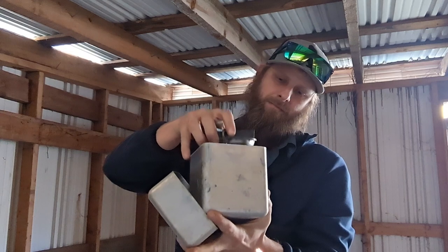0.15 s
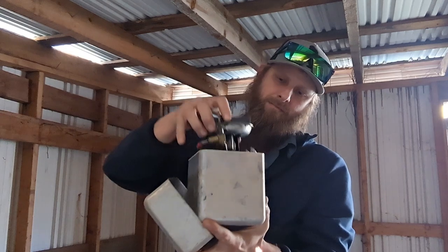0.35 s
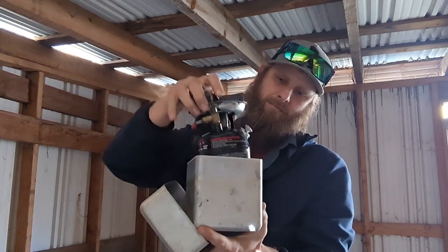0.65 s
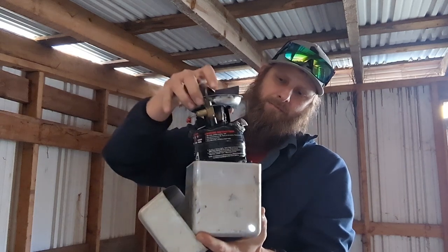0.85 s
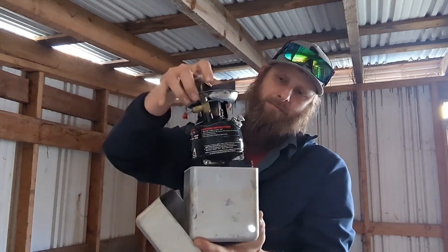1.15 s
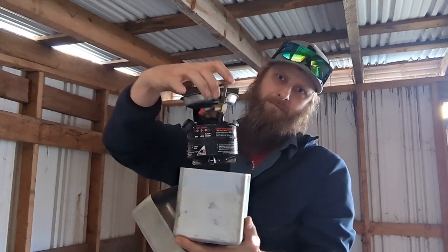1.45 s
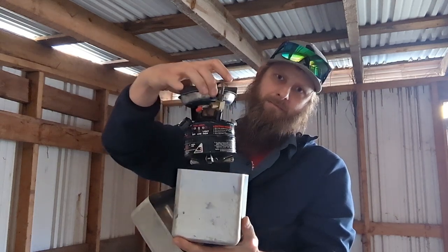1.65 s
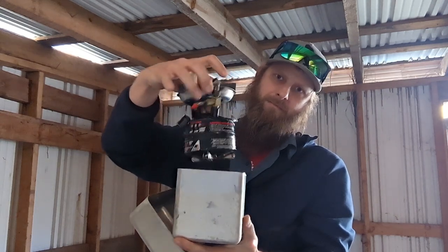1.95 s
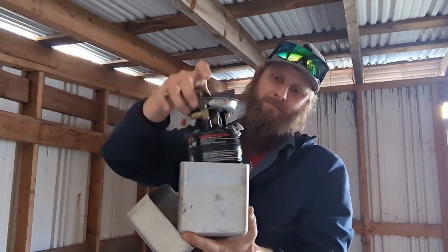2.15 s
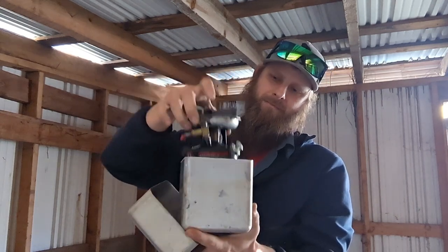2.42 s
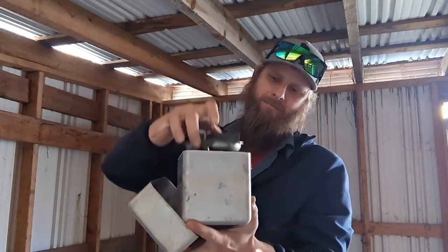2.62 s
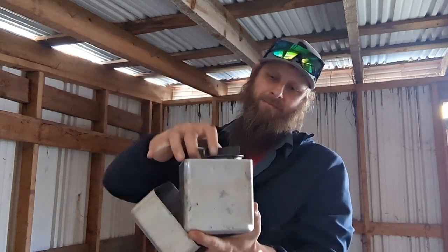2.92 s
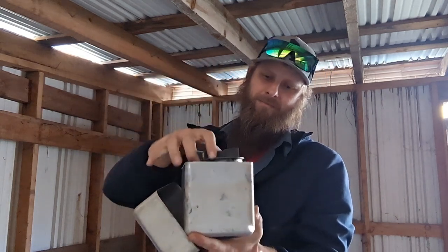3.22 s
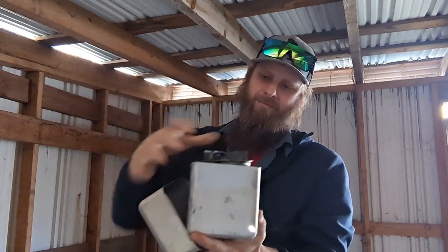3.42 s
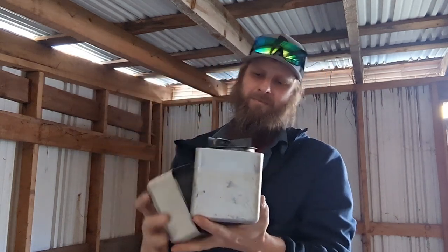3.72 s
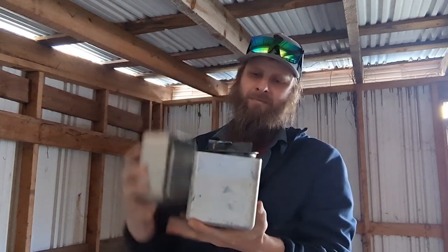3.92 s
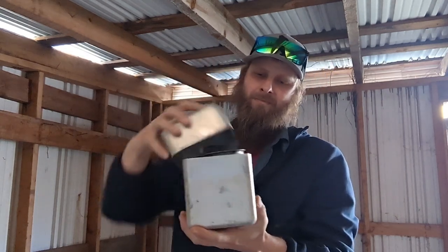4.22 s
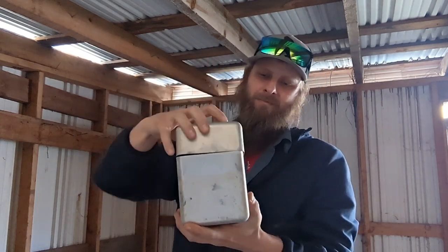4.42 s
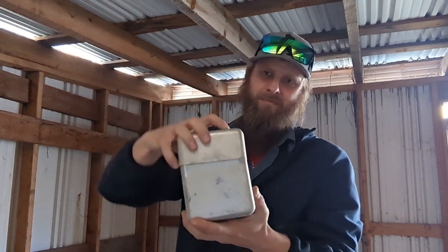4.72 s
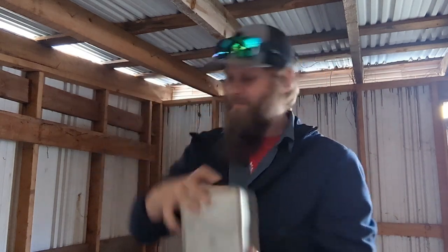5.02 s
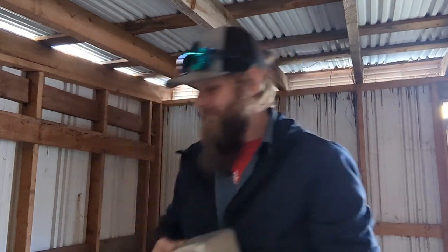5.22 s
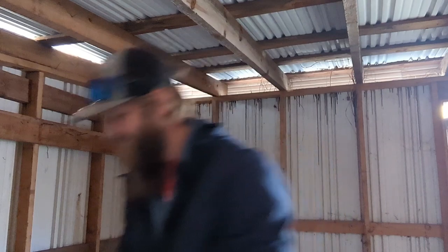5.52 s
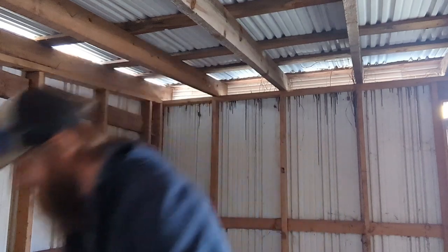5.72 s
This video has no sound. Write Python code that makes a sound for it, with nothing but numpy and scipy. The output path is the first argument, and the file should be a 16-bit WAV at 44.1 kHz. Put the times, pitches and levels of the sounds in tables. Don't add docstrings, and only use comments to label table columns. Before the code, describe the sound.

A close stereo view of hand-held thin metal in a quiet shed, with soft low rumble, a faint wavering hum and a short diffuse echo. From 0 to 0.5 s a small stove scrapes gently out of a square pot with light, hollow ticks. Then it is almost still, apart from faint short bird whistles outside between 0.5 and 2.2 s. At 2.15 s a hollow knock rings, with two weaker ones after. From 2.5 to 2.8 s the stove clatters and slides back in, loudest near 2.74 s, its ring damped by fingers. Around 3.1-3.35 s come small taps and a brighter jingling rattle. The lid clinks and scrapes as it is picked up at 3.8-4.05 s, then knocks and slides on at 4.3-4.6 s, seating with a dull double tap at 4.8 s. From about 5 s to the end, a synthetic jacket swishes, rubs and thumps unevenly, with faint metal ticks.

```python
import sys
import numpy as np
from scipy import signal
from scipy.fft import rfft, irfft, next_fast_len
from scipy.io import wavfile
from scipy.ndimage import map_coordinates

SR = 44100
rng = np.random.default_rng(int(sys.argv[2]) if len(sys.argv) > 2 else 0)


def generate_wav(sig):
    pcm = np.round(np.clip(np.atleast_2d(sig).T, -1, 1) * 32767).astype(np.int16)
    wavfile.write(sys.argv[1], SR, pcm)


def how_loud(loudness_db):
    steps = np.asarray(loudness_db, float) / 20
    return 10 ** steps


N = 258405


def unit(x):
    return x / np.sqrt(np.mean(x ** 2) + 1e-20)


def along(points, hz):
    f, v = np.transpose(points)
    return np.interp(np.log(hz + 1), np.log(f + 1), v)


def curves(rows):
    s, *cols = np.transpose(rows)
    t = np.arange(N) / SR
    first = np.interp(t, [s[0] - 0.01, *s, s[-1] + 0.036], [-120, *cols[0], -120])
    return [first] + [np.interp(t, s, c) for c in cols[1:]]


def wobble(rate):
    knots = rng.standard_normal(int(N * rate / SR) + 4)
    return map_coordinates(knots, [np.arange(N) * rate / SR])


def filtered(x, response):
    m = next_fast_len(N + SR // 2)
    return irfft(rfft(x, m) * response(np.fft.rfftfreq(m, 1 / SR)), m)[..., :N]


def dying(t60s, shape):
    hz, t, z = signal.stft(rng.standard_normal(shape), SR, nperseg=256)
    decay = how_loud(-60 * t / along(t60s, hz)[:, None])
    return signal.istft(z * decay, SR, nperseg=256)[1][..., :shape[-1]]


def rush(spectrum, alike):
    def mid_side_gains(hz):
        turn = np.arccos(np.clip(along(alike, hz), -1, 1)) / 2
        return how_loud(along(spectrum, hz)) * [np.cos(turn), np.sin(turn)]

    mid, side = filtered(rng.standard_normal((2, N)), mid_side_gains)
    return unit(np.array([mid + side, mid - side]))


# frequency in Hz, density in dB per Hz.
RUMBLE = [(13, -43.5), (22, -20.5), (118, -0.5), (143, -4.5), (169, -12), (409, -18.5), (837, -26.5),
          (1100, -35.5), (1490, -34), (1970, -42.5), (2900, -43), (5460, -52.5), (16000, -70)]
# time in seconds, level in dB.
RUMBLE_DB = [(0.0, -54.5), (1.06, -57), (1.35, -59), (2.74, -48.5), (2.97, -51.5), (4.13, -54.5),
             (4.67, -46.5), (4.95, -55.5), (5.86, -53.5)]
# frequency in Hz, left-right likeness (1 is mono).
RUMBLE_ALIKE = [(30, 0.98), (150, 0.92), (400, 1), (1500, 0.32), (8000, .2)]
# frequency in Hz, width in Hz, level in dB.
HUM = (121, 4.8, -59.5)


def air():
    s, db = np.transpose(RUMBLE_DB)
    hz, width, hum_db = HUM
    hum = unit(filtered(rng.standard_normal(N), lambda f: 1 / (1 + ((f - hz) / width) ** 2)))
    rumble = rush(RUMBLE, RUMBLE_ALIKE) * how_loud(1.0 * wobble(3))
    swell = how_loud(np.interp(np.arange(N) / SR, s, db))
    return swell * (rumble + how_loud(hum_db + 55.5) * hum)


# start in seconds, length in seconds, first Hz, last Hz, level in dB.
BIRD_CALLS = [(0.508, 0.032, 6200, 6100, -84), (0.528, 0.085, 3180, 2920, -74), (.73, .05, 4200, 4130, -80),
              (0.74, 0.017, 2900, 2300, -70), (.85, .06, 4250, 4200, -79), (0.943, 0.013, 3010, 2000, -66),
              (1.05, .03, 7100, 6800, -93), (1.1, 0.066, 4130, 4200, -83), (1.295, 0.053, 3080, 3100, -75),
              (1.342, 0.011, 3200, 2380, -65), (1.37, .03, 6950, 6700, -82),
              (1.385, 0.016, 2890, 2600, -69), (1.567, .05, 7000, 7200, -81), (1.7, 0.075, 3140, 3020, -82),
              (1.86, 0.041, 7250, 7000, -71.5), (2.125, 0.039, 6940, 7100, -81)]


def birds():
    out = np.zeros(N)
    for s, length, first_hz, last_hz, db in BIRD_CALLS:
        u = np.arange(round(length * SR)) / round(length * SR)
        pitch = first_hz + (last_hz - first_hz) * u + 900 * rng.standard_normal(len(u))
        whistle = np.sin(2 * np.pi * np.cumsum(pitch) / SR)
        out[round(s * SR):][:len(u)] += how_loud(db) * np.sqrt(np.sin(np.pi * u)) * whistle
    return out


# frequency in Hz, t60 in seconds.
SHED_T60 = [(200, .35), (2000, 0.36), (10000, .15)]


def shed(x):
    tail = dying(SHED_T60, (2, SR // 2))
    late = np.pad(x, (400, 0))
    return signal.fftconvolve(late[None], tail / np.linalg.norm(tail[0]), axes=1)[:, :N]


# time in seconds, swish in dB, thump in dB, rub in dB.
FOLDS = [(4.93, -79.5, -53.5, -74), (4.962, -89, -60, -73), (4.998, -68, -62.5, -70),
         (5.056, -58.5, -47.5, -45), (5.14, -69.5, -61, -63), (5.252, -60.5, -44, -49.5),
         (5.268, -72, -42.5, -54), (5.312, -55.5, -47, -46), (5.364, -73, -60, -61), (5.414, -78, -67, -71),
         (5.452, -51.5, -51, -59), (5.536, -63, -58.5, -60.5), (5.652, -51.5, -60.5, -55),
         (5.738, -65.5, -58.5, -61.5), (5.86, -68.5, -61, -57)]
# frequency in Hz, density in dB per Hz.
SWISH = [(1470, -36), (2500, -1.5), (6540, -5.5), (6850, -2), (7950, -11.5), (11200, -1.5), (15100, -13),
         (16200, -16)]


def jacket():
    swish_db, thump_db, rub_db = curves(FOLDS)
    on = how_loud(np.minimum(swish_db + 90.5, 0))
    folds = wobble(35)
    thump_spectrum = [(100, -37), (150, 0), (400, -3), (700, -13.5), (1000, -45)]
    rub_spectrum = [(500, -33), (800, -0.5), (3000, -10), (4000, -34)]
    swish = how_loud(swish_db + 2 * folds) * rush(SWISH, [(5000, 0.32)])
    thump = how_loud(thump_db - 1 + 5.5 * wobble(25)) * rush(thump_spectrum, [(300, 0.71)])
    rub = how_loud(rub_db - 4.5 + 2.5 * folds) * rush(rub_spectrum, [(1000, 0.38)])
    return swish + on * (thump + rub)


def causal(gain):
    c = irfft(np.log(gain + 1e-5))
    half = c.shape[-1] // 2
    c[..., 1:half] *= 2
    c[..., half + 1:] = 0
    return np.exp(rfft(c))


# frequency in Hz, density in dB per Hz.
SHEET = [(120, -54), (200, -17.5), (520, 3.5), (570, 0), (711, -6), (871, -23), (1190, -19.5), (1780, -24),
         (2820, -22.5), (3330, -23), (3860, -22.5), (11600, -31.5), (16200, -43.5)]
# frequency in Hz, t60 in seconds.
SHEET_T60 = [(300, 0.14), (2000, 0.096), (10000, 0.074)]
EDGES_HZ = (260, 900, 3300)
RING = 2 ** 15
BINS = np.fft.rfftfreq(RING, 1 / SR)
ABOVE = [1 / (1 + (edge / (BINS + 1)) ** 8) for edge in EDGES_HZ]
RANGES = causal(np.array([ABOVE[0] * (1 - ABOVE[1]), ABOVE[1] * (1 - ABOVE[2]), ABOVE[2]])[:, None])
SHEET_COLOUR = causal(how_loud(along(SHEET, BINS)))


def even(z):
    return z / np.sqrt(np.mean(abs(z) ** 2, 2, keepdims=True))


def response(modes, grip, free_db, sheet_db, alike):
    t = np.arange(RING // 2) / SR
    hz, db, t60 = np.transpose(modes)[:, :, None]
    t60 = np.clip(t60, 0.03, 1.3)
    held = hz < EDGES_HZ[1]
    fade = how_loud(-60 * t / (grip * t60)) + how_loud(free_db - 20 * held - 60 * t / t60)
    turn = rng.normal(0, np.arccos(np.clip(alike, 0, 1)), (2, len(modes)))
    strength = how_loud(db[:, 0] + rng.normal(0, 4.1, len(modes)) + rng.normal(0, 4, turn.shape))
    wave = fade * np.exp(2j * np.pi * hz * t) * np.cos(np.pi * t * SR / RING)
    onset = 1 - np.exp(-t / 0.0004)
    tones = rfft(np.imag((strength * np.exp(1j * turn)) @ wave) * onset, RING)
    puff = dying(SHEET_T60, (3, RING // 2))
    sheet = rfft(puff[0] * alike + puff[1:] * np.sqrt(abs(1 - alike ** 2)), RING) * SHEET_COLOUR
    return even(even(RANGES * tones) + how_loud(sheet_db)[:, None, None] * even(RANGES * sheet))


def strike(hits, body, settle_db):
    out, t = np.zeros((2, N + RING)), np.arange(RING) / SR
    for s, db, boom_db, sizzle_db, pan_db, chatter in hits:
        push = rng.standard_normal(RING) * (rng.random(RING) < 700 / SR) * (t < chatter)
        push[0] = 3
        bands = irfft(body() * rfft(push), RING)
        bands /= np.abs(bands).max((1, 2), keepdims=True)
        sound = np.tensordot(how_loud([boom_db, 0, sizzle_db]), bands, 1)
        rest = how_loud(settle_db * np.clip((t - chatter) / 0.008, 0, 1))
        sides = how_loud(db + np.array([[pan_db], [-pan_db]]) / 2)
        out[:, round(s * SR):][:, :RING] += sides * sound * rest
    return out[:, :N]


def slide(strokes, body, rough_db):
    out = np.zeros((2, N))
    for rows in strokes:
        db, boom_db, sizzle_db, pan_db = curves(rows)
        slips = rng.standard_normal(N) * (rng.random(N) < 2500 / SR)
        grains = unit(slips * how_loud(rough_db * wobble(60)))
        pan = np.array([pan_db, -pan_db]) / 2
        for part, rel_db in zip(irfft(body(), RING), (boom_db, 0, sizzle_db)):
            force = grains[None] * how_loud(db + rel_db - 4 + pan)
            out += signal.fftconvolve(force, part, axes=1)[:, :N]
    return out


# start in seconds, side-wall peak in dB, boom and sizzle in dB
# relative to it, left-right in dB, chatter in seconds.
SHUT_HITS = [
    (4.7968, -32.5, 11, 10.5, 3.5, 0.01),
    (4.811, -33, 1.3, -7, 4.3, 0.0094),
]
# frequency in Hz, level in dB, t60 in seconds.
SHUT_MODES = [(397, 1.5, 0.187), (515, -8, 0.16), (1870, -9, 0.247), (3338, -43, 0.28), (3750, -44, 0.75),
              (4737, -31, 0.18), (5292, -33, 0.23), (5700, -18, 0.15), (5980, -32.5, 0.37),
              (6110, -15.5, 0.21), (6200, -5, 0.19), (8091, -46, 0.093), (8592, -36, 0.1),
              (9555, -58.5, 5.0), (10520, -40, 0.25), (12200, -18, 0.15)]


def closed_set():
    body = lambda: response(SHUT_MODES, 0.25, -10, [-4, -2, -6], 0.4)
    return strike(SHUT_HITS, body, -4)


# start in seconds, side-wall peak in dB, boom and sizzle in dB
# relative to it, left-right in dB, chatter in seconds.
LID_HITS = [(3.1184, -51, 4, -17, 2, 0.018), (3.1812, -41, 12, -5.5, 4, 0.02),
            (3.2294, -48, 9, -5, -0.5, 0.015), (3.7374, -55.5, 1, -8, 4, 0.015),
            (3.7883, -40.5, 11.5, 0.5, 5.5, 0.015), (3.8255, -18, -10.5, -13.5, 5.5, 0.015),
            (3.9431, -30, -6.5, -12.5, 1.0, 0.015), (3.9744, -38.5, 6.5, -9.5, 6, 0.015),
            (4.0424, -49, 4, -31, -8, 0.013), (4.3021, -29.5, -7, -12, 8, 0.015),
            (4.3111, -18.5, -6.5, -22.5, 1.5, 0.015), (4.365, -27.5, 10, -10.5, 3.5, 0.023),
            (4.4178, -20.5, -1.5, -9.5, 0, 0.015), (4.4464, -32, 5, -23, 0, 0.0075),
            (4.5081, -33, 4, -11, 1, 0.015), (4.5638, -29.5, 2, -7, -1, 0.015),
            (4.6653, -39.5, 13, -5.5, 2, 0.015), (4.6894, -41, 10.5, -7, 1, 0.015),
            (4.7721, -35, -1, 2, 3.5, 0.015), (5.0305, -41, 1.5, -7, 6.5, 0.015),
            (5.0554, -39.5, -12, -28, 12, 0.015), (5.2821, -45.5, 5, 1, 4.5, 0.015),
            (5.3071, -37, -4, -7, 6, 0.015), (5.451, -48.5, 1, -8, 10, 0.015),
            (5.808, -47, -3, -22, 3, 0.015)]
# frequency in Hz, level in dB, t60 in seconds.
LID_MODES = [(314, -3, .2), (406.6, 0, 0.22), (502, 0, 0.23), (587.3, -4.5, .2), (715, -5.5, 0.14),
             (846, -7, 0.11), (1229, -5.5, 0.22), (1400, -12.5, 0.18), (1552, -2, 0.145), (1670, -6, 0.42),
             (1826, -10, .3), (2136, -12, 0.18), (2490, -10.5, 0.23), (2600, -10, 0.17), (2900, -15, 0.28),
             (3098, -14, 0.39), (3784, -16.5, .4), (4487, -17.5, .4), (6115, -30.5, 0.17),
             (7063, -23.5, 0.23)]
# time in seconds, side walls in dB, boom and sizzle in dB relative
# to them, left-right in dB.
LID_SLIDES = [
    [(3.79, -54.5, 10, 3, 0.5), (3.846, -28, -3, -17.5, 1.5), (3.916, -43, -7, -2, 0),
     (3.94, -37, -8, -6, 5.5), (4.042, -55, 12, -24.5, 8), (4.15, -68, 11.5, -7, -2.5)],
    [(4.31, -42, -5.5, -14.5, -3.5), (4.314, -27.5, -10.5, -7, -1.5), (4.392, -42.5, 10, -17.5, 3.5),
     (4.428, -30.5, 4, -11, 1), (4.48, -47, 16.5, -10, 5), (4.58, -48.5, 8.5, -10, 11),
     (4.728, -62.5, 14, -16, 1.0), (4.81, -46, 15.5, -2.5, 5), (4.9, -70.5, 23, -4, 5)],
]


def lid():
    body = lambda: response(LID_MODES, 0.27, -20, [-2, -3, 5], 0.4)
    return strike(LID_HITS, body, -3.5) + slide(LID_SLIDES, body, 3.3)


# start in seconds, side-wall peak in dB, boom and sizzle in dB
# relative to it, left-right in dB, chatter in seconds.
STOVE_HITS = [
    (3.2905, -28.5, -10, -4.5, 1.5, 0.017),
    (3.3147, -29, -5.5, -4.5, 2.5, 0.022),
    (3.3319, -36.5, 3.5, -7.5, 0.41, 0.015),
]
# frequency in Hz, level in dB, t60 in seconds.
STOVE_MODES = [(641, -5.5, 0.14), (814, -20, 0.28), (1210, -23.5, 0.35), (1857, -39, 0.31),
               (2200, -30, 0.17), (2650, -27, 0.4), (3400, -25.5, 0.19), (3980, -19.5, 0.21),
               (4242, -13, 0.16), (4410, -37, 2.3), (5717, -25, 0.11), (5790, -32, 0.16), (6650, -16, 0.19),
               (7026, -37, 0.2), (7900, -21, 0.19), (8231, -15.5, 0.09), (10240, -5, 0.17),
               (11120, -23, 0.11), (11840, -27, 0.17), (12510, -4, 0.17)]
# time in seconds, side walls in dB, boom and sizzle in dB relative
# to them, left-right in dB.
STOVE_SLIDES = [
    [(3.17, -54.5, 8, -11, 3.3), (3.192, -55.5, 12, -5.5, 1.0), (3.276, -57, 12.5, -9.5, 2.3),
     (3.296, -38.5, 1, 9.5, 3.5), (3.346, -49.5, 7.5, 3, 1.0), (3.46, -76.5, -3, 1, 1.6)],
]


def stove():
    body = lambda: response(STOVE_MODES, 0.5, -9.5, [-2, -2, 0], 0.35)
    return strike(STOVE_HITS, body, 0) + slide(STOVE_SLIDES, body, 3.7)


# start in seconds, side-wall peak in dB, boom and sizzle in dB
# relative to it, left-right in dB, chatter in seconds.
EMPTY_HITS = [(0.0199, -41, -2, -19, 4, 0.021), (0.1655, -46, 10.5, -10, 3, 0.035),
              (0.184, -41, -3, -15, 4, 0.024), (0.2394, -39, 9, -14.5, 1.5, 0.032),
              (0.2844, -33, -2, -15, 4, 0.03), (0.3094, -37, 4, -23, 0.5, 0.03),
              (0.3626, -39.5, 2.5, -9, -1, 0.022), (0.3955, -41.5, -3, -17, 1, 0.03),
              (0.4953, -50, -3, -27, 3.0, 0.027), (2.1555, -14, 10, -11, 3, 0.029),
              (2.1994, -27, 0.5, -12, 5, 0.029), (2.2513, -29, 6, -12.5, 8.5, 0.031)]
# frequency in Hz, level in dB, t60 in seconds.
EMPTY_MODES = [(333, -8.5, 0.23), (532, -11.5, 0.41), (672.3, -2.5, 0.21), (1125, -30, 1.3),
               (1249, -14.5, 0.18), (1539, -13, 0.29), (1960, -22, 0.36), (2037, -21.5, 0.28),
               (2070, -24.5, 0.53), (2299, -37, 5.0), (2367, -30, 0.47), (2510, -29.5, 0.35),
               (2920, -24, 0.52), (3758, -48, 5.0), (4140, -22, 0.31), (4325, -46, 0.67),
               (4560, -26, 0.068), (4800, -43, 0.44)]
# time in seconds, side walls in dB, boom and sizzle in dB relative
# to them, left-right in dB.
EMPTY_SLIDES = [
    [(0.0, -64, 14, -6, 3.0), (0.018, -51.5, 1, -1.5, 2), (0.102, -61.5, 7, -19, 6), (0.266, -46, 0, -8, 4),
     (0.286, -45, -4, -11, -2), (0.32, -47, 9, -3, 5), (0.494, -71, 3, -16, 3), (0.592, -82, -4, -7, -3),
     (0.62, -85, 0, -15, 5)],
]


def empty_pot():
    body = lambda: response(EMPTY_MODES, 0.79, -14.5, [-10, -3, 4], 0.49)
    return strike(EMPTY_HITS, body, -6.5) + slide(EMPTY_SLIDES, body, 2.3)


# start in seconds, side-wall peak in dB, boom and sizzle in dB
# relative to it, left-right in dB, chatter in seconds.
POT_HITS = [(2.4987, -20, 1, -3, 1.0, 0.02), (2.5446, -27.5, 3, -9.5, 0.5, 0.02),
            (2.5863, -21, 3.5, -7, 1.0, 0.02), (2.6074, -23.5, 8, -20.5, 3.5, 0.02),
            (2.6312, -27, 8.5, -10.5, 3.5, 0.02), (2.688, -14.5, -5, -15, 2, 0.02),
            (2.7353, -7, -2, -9, -7.5, 0.02), (2.7539, -11.5, 2, -25.5, 3.5, 0.02),
            (2.7844, -18, -9, -20.5, -0.5, 0.019)]
# frequency in Hz, level in dB, t60 in seconds.
POT_MODES = [(325, -9.5, 0.24), (397, -9.5, 0.27), (503, 0, 0.2), (671, -3.5, 0.1), (700, -18.5, 0.95),
             (938, -23, 0.27), (1147, -15, 0.19), (1356, -11.5, 0.21), (1570, -8, 0.19), (1950, -17, 0.25),
             (2080, -24.5, 0.21), (2525, -11.5, 0.11), (2583, -2, 0.077), (2752, -18.5, 0.22),
             (3800, -28.5, 0.45), (3995, -13, 0.13), (4463, -22.5, 0.25), (5500, -24.5, 0.16),
             (6000, -29.5, 0.17), (6132, -27.5, 0.062), (6800, -31, 0.27), (7100, -27, 0.25),
             (7100, -45, 0.41), (8100, -33.5, 0.14)]
# time in seconds, side walls in dB, boom and sizzle in dB relative
# to them, left-right in dB.
POT_SLIDES = [
    [(2.5, -28.5, -2, -6, 11), (2.514, -34, 7.5, 0, 3.5), (2.684, -35.5, 8, -4, 1.5),
     (2.694, -26, 7, 1.5, 3.5), (2.726, -35, 12, -11.5, 8.5), (2.742, -23, 10.5, -1.5, 1),
     (2.95, -74.5, 5, -16, -4)],
]


def loaded_pot():
    body = lambda: response(POT_MODES, 0.26, -16, [-4, -3, 4], 0.41)
    return strike(POT_HITS, body, -2) + slide(POT_SLIDES, body, 3.7)


def scene():
    metal = empty_pot() + loaded_pot() + stove() + lid() + closed_set()
    near, far = metal + jacket(), birds()
    return near + how_loud(-12) * shed(near[0]) + 0.73 * far + how_loud(-5) * shed(far) + air()


def roll_off(x):
    return signal.sosfilt(signal.butter(12, 17000, fs=SR, output="sos"), x)


def record(dry):
    top_hz = 15850
    mix = filtered(dry, lambda hz: how_loud(-25 * (hz > top_hz)))
    return roll_off(mix)


dry = scene()
out = record(dry)
generate_wav(out)
```